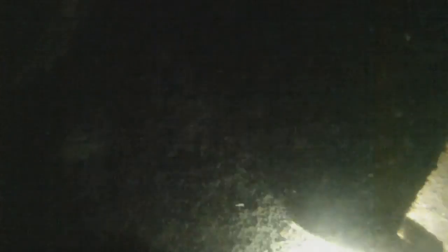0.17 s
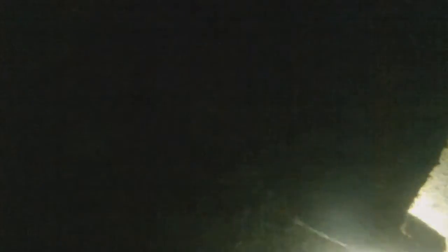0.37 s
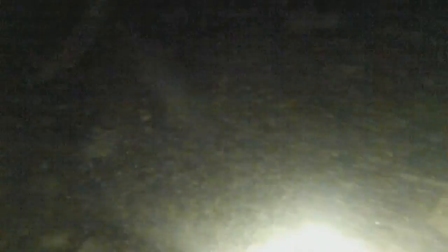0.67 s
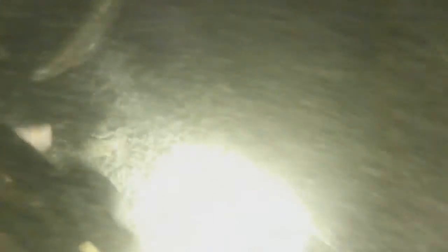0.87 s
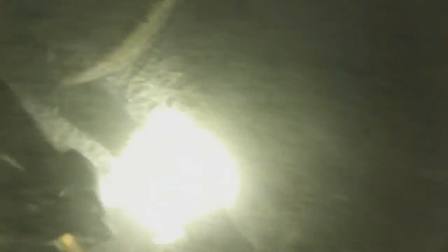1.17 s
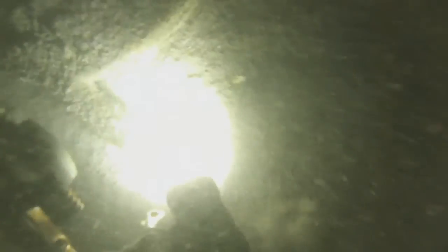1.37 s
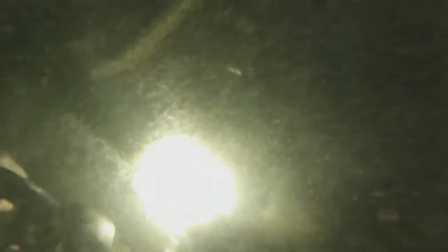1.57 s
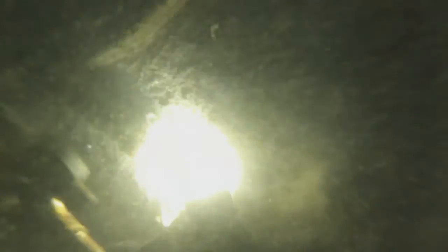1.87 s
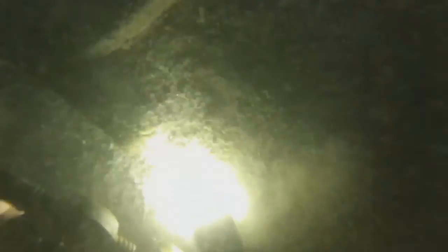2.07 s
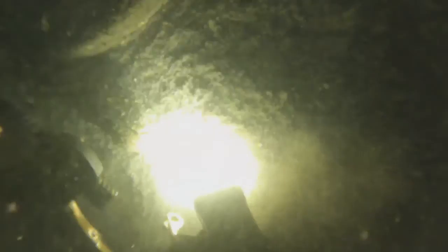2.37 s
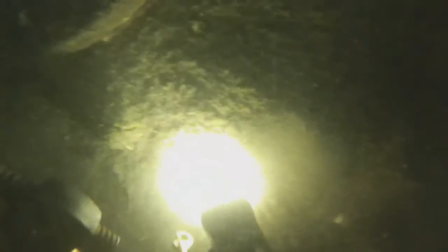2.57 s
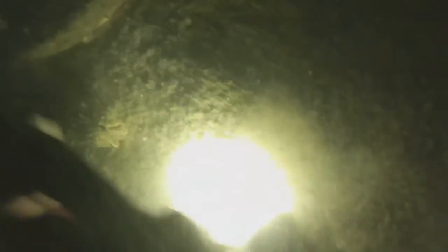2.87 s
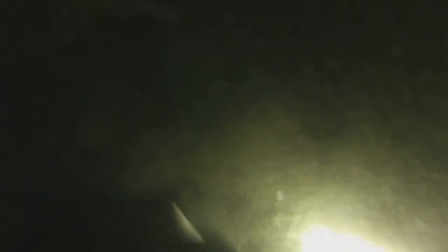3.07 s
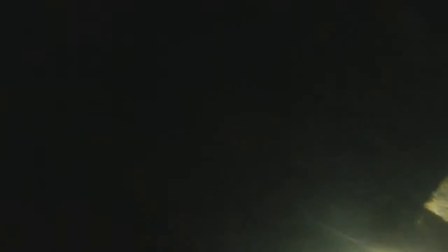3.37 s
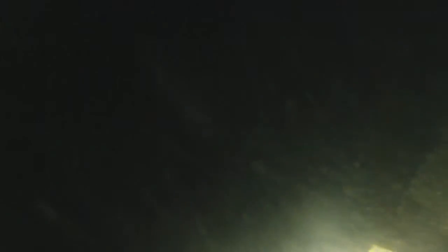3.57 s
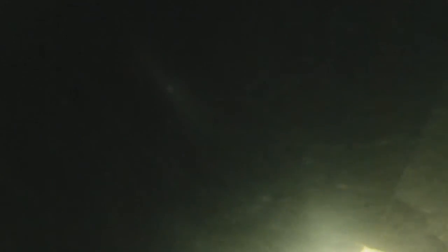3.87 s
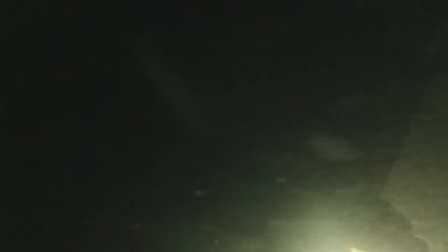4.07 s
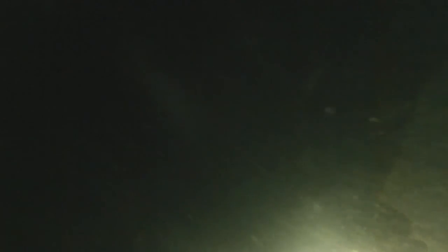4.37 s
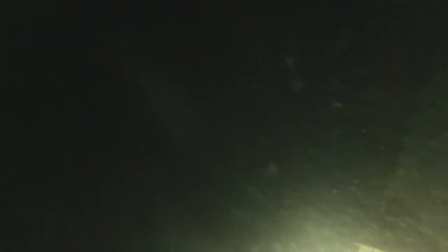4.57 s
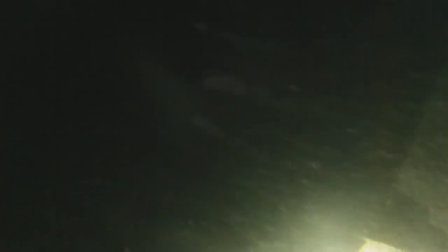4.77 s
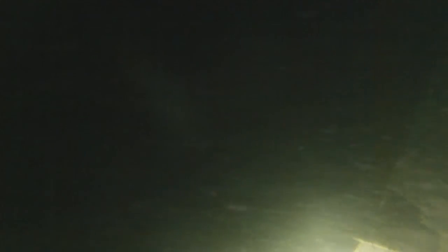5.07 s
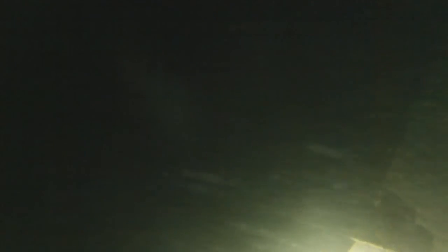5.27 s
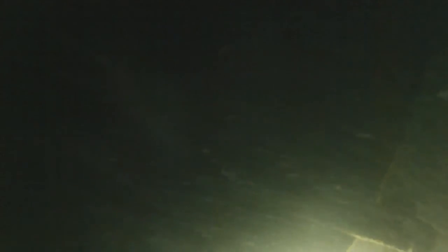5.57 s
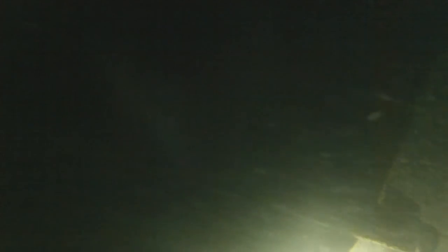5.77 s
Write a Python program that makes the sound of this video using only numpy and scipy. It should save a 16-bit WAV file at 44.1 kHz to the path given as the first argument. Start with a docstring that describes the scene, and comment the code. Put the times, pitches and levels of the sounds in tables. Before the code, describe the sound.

Sharp, close knocks and bright metal clinks come from a diver's gear hitting the camera housing underwater in a sunken ship. An early knock sets a steel part ringing briefly, and the hull booms quietly behind the blows. Low water rumble, fine crackle and a faint high whine run throughout, with small squeaks and bubbles. The second half is quieter, with soft thuds of handling, and ends on a dry snap.

```python
"""A diver moves through a flooded steel wreck, heard from inside a camera housing.
From the start, water rumbles, the camera whines, straps and silt crackle, and dragged gear squeaks.
A metal clip jingles, gear taps, then a knock sets a steel part ringing and the hull booms in answer.
Hands begin to bump the rig, a few small bubbles ring, and more knocks and booms follow.
After about three seconds the knocks stop; lighter taps and bumps go on, and one sharp snap comes last."""
import sys
import numpy as np
from scipy import signal
from scipy.fft import rfft, irfft, next_fast_len
from scipy.io import wavfile
from scipy.ndimage import uniform_filter1d

SR = 44100
rng = np.random.default_rng(int(sys.argv[2]) if len(sys.argv) > 2 else 0)


def persist_wave(psi):
    """Save psi, clipped to +-1, as 16-bit WAV."""
    counts = np.round(np.clip(psi, -1, 1) * 32767).astype(np.int16)
    wavfile.write(sys.argv[1], SR, np.atleast_2d(counts).T)


N = 260631
TIME = np.arange(N) / SR
EVENT_SIZE = 16384  # samples in one short sound
AGE = np.arange(EVENT_SIZE) / SR  # seconds since that sound began

# how hard the diver moves, given as the loudness of the rubbing: t/s, level/dB
EFFORT = [(0.0, -73), (0.42, -65), (0.56, -75.5), (0.93, -69.5), (1.24, -66), (1.35, -62), (1.71, -59.5),
          (1.86, -66.5), (2.08, -65.5), (2.24, -62.5), (2.99, -63.5), (3.02, -61), (3.41, -70), (5.8, -71)]
# tone colour of the water's rumble and hiss: f/Hz, relative level/dB
WATER_COLOUR = [(12, -32), (20, 3), (49, 0), (93, -13.5), (228, -21), (270, -24), (367, -28.5),
                (574, -28.5), (698, -29), (1660, -32), (3440, -35.5), (5080, -43), (5680, -39.5),
                (14700, -41), (16000, -46.5)]
# the camera's high tones: f/Hz, relative level/dB
WHINE_TONES = [(5039, -78), (7558, -91), (8823, -91), (11294, -91), (15122, -88)]
# narrow bands of hiss around them: f/Hz, width/Hz, relative level/dB
WHINE_HISS = [(5060, 150, -83), (15130, 150, -87)]
# notes the housing rings at: f/Hz, relative level/dB, t60/s (the time to fade by 60 dB)
HOUSING_NOTES = [(1307, -9.5, 0.018), (1380, -10, 0.013), (1591, -1.5, 0.021), (1787, -5, 0.017),
                 (2094, -12, 0.059), (2660, 6.5, 0.017), (2737, 0.5, 0.021), (3110, -21, 0.06),
                 (3240, -9.5, 0.025), (3530, -0.5, 0.017), (4210, -9, 0.048), (4750, -11.5, 0.011),
                 (5150, -1.5, 0.021), (6450, -6.5, 0.019), (7100, 1, 0.004), (8600, -5.5, 0.017),
                 (11800, -14, 0.013)]
# tone colour of a light touch: f/Hz, relative level/dB
TAP_COLOUR = [(200, -11.5), (950, -22.5), (1600, 0), (2300, 2.5), (2750, -9), (3400, -10), (4300, 4.5),
              (5300, 2), (5800, -6.5), (7200, 0.5), (9600, -14.5), (11300, -6.5), (13000, -17.5),
              (14500, -18.5)]
# gear drags over the housing: t/s, f/Hz, squeak level/dB, contact/ms, rasp level/dB
SCRAPES = [(0.028, 1530, -48, 5, -53), (0.085, 1610, -53, 5.5, -60), (1.174, 1650, -50.5, 4, -53.5),
           (1.332, 2220, -54, 2.9, -51), (1.359, 1650, -48.5, 5, -63), (2.262, 1600, -48, 17, -63),
           (3.081, 2100, -36, 3.3, -36), (3.704, 2820, -57.5, 21.4, -55.5), (3.887, 2840, -57.5, 40, -58),
           (4.115, 2750, -56, 26, -53), (4.338, 2770, -50, 27, -55), (4.662, 2740, -61.5, 10, -57),
           (5.678, 1670, -53, 19, -58.5)]
JINGLES = [(0.3216, -21, 4.4, -13, 0, 1), (0.439, -30, 1.3, -26, 2, 4), (0.4792, -39, 1.7, -4, 3, -3.5),
           (0.519, -29.5, 2.7, -19, -2, -3.5), (1.0704, -43, 2.5, -2, -13, -4),
           (1.4182, -25, 4.7, -17.5, -3.5, 1), (1.669, -37.5, 3.3, -19, -1, 5.5),
           (1.7626, -41.5, 0.99, -34, 7, -2), (1.8487, -27.5, 2.1, -5.5, 6.5, 4.5),
           (2.0294, -24, 2.2, -7, -8, 2.5), (3.1959, -34.5, 6.8, -42, -8.5, -10.5),
           (4.1726, -39, 0.8, -17, -24, 3)]
CLIP_NOTES = [(3645, -2, .048), (4334, -7, .026), (5233, -9, .026), (6610, -14, .035), (7400, -7, .042),
              (8696, -1, .046), (11060, -10, .045), (11450, -4, .036), (14050, -6, .03)]
CLIP_COLOUR = [(300, -21), (1000, -29.5), (1700, -1), (3000, -9.5), (3650, -2), (4700, -1), (5300, 1),
               (5900, -4.5), (7300, -1.5), (9700, -12.5), (11300, 1), (12700, -16), (14000, -8.5),
               (15500, -20)]
# the clearest taps of gear: t/s, level/dB, contact/ms, body/dB, treble/dB
TAPS = [(0.4049, -26, 14.6, -2, 3), (.602, -43.5, 1.15, -17, 2.5), (0.9915, -32, 2.1, -10, 5.5),
        (1.058, -37.5, 1.7, -4, -26), (1.083, -44, 2.1, -4, -20), (1.1131, -24.5, 1.7, -1.5, -11),
        (1.1214, -25, 3.1, -3.5, -10.5), (1.3915, -42, 8, -4, -28), (1.641, -32, 7.7, -14, -33),
        (1.685, -38.5, 7.4, 1, -5), (2.077, -34.5, 1.3, -5, 9), (2.1148, -26, 5.4, 1.5, -9),
        (2.2472, -33.5, 1.17, -12, -17.5), (2.4454, -45, 2.8, -23, -11), (2.697, -48, 2, -8, -28),
        (2.8804, -30.5, 2.2, -1.5, -17), (2.9217, -19.5, 2.6, -13, 0), (2.933, -36, 9.6, -1, -7),
        (2.977, -41.5, 18.4, 11, -12), (3.0151, -29.5, 0.62, 10, -12), (3.0816, -32, 1.7, -3.5, -19),
        (3.337, -41, 4.3, -3, -12), (3.357, -45.5, 3.4, -6, -14), (3.4519, -39, 2.9, -15, -16),
        (3.4667, -30.5, 2.8, -10, -7), (3.858, -50.5, 5.2, -9, -11.5), (3.937, -41.5, 3, -9.5, 6),
        (4.215, -48.5, 2.8, 7.5, -5)]
# the one blow that catches a steel part: t/s, level/dB
STEEL_BLOW = (0.4162, -34)
# notes that part rings at: f/Hz, relative level/dB, t60/s
STEEL_NOTES = [(1491, -9, .3), (1610, 0, .16), (2681, -17, .2)]
# blows on the housing: t/s, level/dB, contact/ms, tilt/(dB per octave), step per bounce/dB, weight/dB
KNOCKS = [(0.4165, -18, 2.6, -10.5, -4.5, -52.5), (0.4215, -8, 0.16, 4.5, -20, -40),
          (1.6206, -13.5, 2.23, -1, -5.5, -43), (1.6259, -11, 1.07, 17.5, -33.5, -35.5),
          (2.0872, -4, 1.92, 0.5, -7, -36.5), (2.5086, -8, 1.5, -2, -6.5, -31.5),
          (2.9114, -28, 0.97, -1.5, -7, -58), (3.061, -34, 0.51, -6, -7.5, -49.5)]
# tone colour of a hard blow: f/Hz, relative level/dB
KNOCK_COLOUR = [(100, -10), (330, -6), (650, -9.5), (950, -8.5), (1400, 4), (2700, 4.5), (3050, -7),
                (4600, -1), (5800, -9), (7200, -4.5), (9700, -25), (11300, -13), (13000, -30.5),
                (14500, -28)]
# low notes of the housing's hollow body: f/Hz, relative level/dB, t60/s
HOLLOW_NOTES = [(290.7, -2.5, .06), (329, -4.5, 0.16), (462, -6.5, 0.066)]
# blows straight on the hull: t/s, level/dB, tilt/(dB per octave)
HULL_BLOWS = [(1.686, -33.5, -0.5), (2.116, -34.5, -2)]
# tone colour of the echoes in the hull: f/Hz, relative level/dB
HULL_COLOUR = [(50, -5), (110, 2.5), (190, -3), (320, -9.5), (600, -6), (1000, -24), (2500, -35)]
# notes the hull's plates ring at: f/Hz, relative level/dB, t60/s
PLATE_NOTES = [(103, -11.5, 0.87), (202, -10.5, 0.41), (218, -9.5, 0.62), (324, -2, 0.05),
               (360, -3.5, 0.12), (395, -2, 0.083), (460, 0.5, 0.1), (605, -9, 0.14)]
# hands bump the rig: t/s, thud level/dB, sway level/dB
BUMPS = [(.706, -43.5, -54), (1.028, -41.5, -45.5), (1.562, -43.5, -39), (2.958, -36.5, -44.5),
         (3.288, -40.5, -60), (3.566, -36.5, -35), (3.914, -42, -50), (4.21, -44.5, -42),
         (4.446, -42.5, -40.5), (4.795, -45, -61), (4.849, -39, -67), (5.006, -38.5, -35),
         (5.104, -29.5, -49), (5.257, -51, -37.5), (5.461, -36, -30.5)]
# small bubbles: t/s, f/Hz, level/dB, t60/s
BUBBLES = [(1.06, 3020, -40, 0.062), (1.286, 3070, -51, 0.097), (2.937, 2800, -29.5, 0.037),
           (3.013, 2790, -30, 0.046)]
# one dry snap close by: t/s, level/dB, contact/ms
SNAP = (5.8501, -15, 1.43)
# tone colour of the snap: f/Hz, relative level/dB
SNAP_COLOUR = [(300, -41), (1100, -49), (2000, -16.5), (2700, -6), (3500, -8.5), (4800, -0.5), (5500, -20),
               (6300, 8), (7300, 5), (8500, -3), (9700, -7), (10500, -0.5), (13000, -18.5), (15000, -20)]


def gain(db):
    """Turn decibels into a number to multiply by."""
    return 10 ** (np.asarray(db) / 20)


def unit(x):
    """Scale a sound to an average strength (rms) of 1."""
    return x / np.sqrt(np.mean(x ** 2))


def fade(t60):
    """A smooth fade that loses 60 dB in t60 seconds."""
    return gain(-60 * AGE / max(t60, 1e-3))


def add(out, t, x, db):
    """Mix a sound in at t seconds so that its loudest 2 ms stand at db."""
    start = int(t * SR)
    peak = np.sqrt(uniform_filter1d(x ** 2, size=88).max())
    out[start:start + len(x)] += x[:N - start] * gain(db) / peak


def colour(x, points, tilt_db=0):
    """Shape a sound along (Hz, dB) points; a tilt above 0 dB per octave brightens it."""
    n = 2 * next_fast_len(len(x) // 2 + 1)
    hz, db = np.transpose(points)
    octave = np.log2(np.maximum(np.arange(n // 2 + 1) * SR / n, 1))
    curve_db = np.interp(octave, np.log2(hz), db + tilt_db * np.log2(hz / hz.mean()))
    cepstrum = irfft(np.log(gain(curve_db)))
    # fold the filter forward in time, so nothing sounds before the hit
    cepstrum[1:n // 2] *= 2
    cepstrum[n // 2 + 1:] = 0
    return irfft(rfft(x, n) * np.exp(rfft(cepstrum)))[:len(x)]


def band(x, hz, kind):
    """Keep only the lows, the highs or a band between."""
    return signal.sosfilt(signal.butter(4, hz, kind, fs=SR, output="sos"), x)


def resonate(x, hz, width_hz):
    """Keep the sound near one pitch; filtering twice makes the edges steep."""
    b, a = signal.iirpeak(hz, hz / width_hz, fs=SR)
    return signal.lfilter(b, a, signal.lfilter(b, a, x))


def ring(notes, spot_db=0, detune=0):
    """A struck thing rings with fading notes; each spot favours other notes and shifts them a little."""
    chance = rng.standard_normal((len(notes), 3))
    out = np.zeros(EVENT_SIZE)
    for (hz, db, t60), (favour, shift, phase) in zip(notes, chance):
        tone = np.sin(2 * np.pi * (hz * (1 + detune * shift) * AGE + phase))
        out += gain(db + spot_db * favour) * fade(t60) * tone
    return out


def contact(ms):
    """The push of one thing on another: it swells and lets go."""
    progress = AGE * 1000 / ms
    return progress * np.exp(-2 * progress)


def strike(ms, notes, tone_colour, ring_db, tail_t60, tail_db, spot_db, detune=0.013):
    """A hit cracks, builds up the ringing while it lasts and leaves a short tail of echoes."""
    force = contact(ms)
    rise = np.cumsum(force) / force.sum()
    loudness = unit(force) + gain(tail_db) * unit(rise * fade(tail_t60))
    crack = colour(loudness * rng.standard_normal(EVENT_SIZE), tone_colour)
    return unit(crack) + gain(ring_db) * unit(rise * ring(notes, spot_db, detune))


def balance(x, body_db, treble_db):
    """Where and how hard a thing is touched sets its body and treble against the middle."""
    body = unit(band(x, 3200, "low"))
    middle = unit(band(x, [3200, 8000], "band"))
    treble = unit(band(x, 8000, "high"))
    return gain(body_db) * body + middle + gain(treble_db) * treble


def water(rub_db, base_db=-53, split_hz=300):
    """Water pushes on the housing, rumbling more as the diver works harder, under an even hiss."""
    noise = unit(colour(rng.standard_normal(N), WATER_COLOUR)) * gain(base_db)
    boost_db = 6.5 + 0.56 * (rub_db - rub_db.max())
    rumble = band(noise, split_hz, "low") * gain(boost_db)
    hiss = band(noise, split_hz, "high") * gain(0.28)
    return rumble + hiss


def waver(spread_db=2, changes_per_s=9):
    """A loudness that wanders at random."""
    return gain(spread_db * np.interp(TIME * changes_per_s, np.arange(256), rng.standard_normal(256)))


def camera_whine(whistle_hz=7130, whistle_db=-68, whistle_end_s=0.6):
    """The camera's electronics whine unsteadily; a thin, hissy whistle dies away early on."""
    tones = sum(np.sqrt(2) * gain(db) * waver() * np.sin(2 * np.pi * hz * TIME)
                for hz, db in WHINE_TONES)
    hiss = sum(gain(db) * waver() * unit(resonate(rng.standard_normal(N), hz, width_hz))
               for hz, width_hz, db in WHINE_HISS)
    whistle = unit(resonate(rng.standard_normal(N), whistle_hz, width_hz=380))
    whistle_fade = np.clip((whistle_end_s - TIME) / 0.19, 0, 1)
    return gain(-2) * (tones + hiss) + whistle * gain(whistle_db) * whistle_fade


def rubbing(rub_db, spots=7, grains_per_s=75, spread_db=2.5):
    """Straps and silt crackle in tiny grains on several spots of the housing, each with its own ring."""
    out = np.zeros(N)
    for _ in range(spots):
        grains = (rng.random(N) < grains_per_s / SR) * rng.choice([-1, 1], N)
        strength = gain(spread_db * np.minimum(rng.exponential(size=N), 4))
        click = strike(3, HOUSING_NOTES, TAP_COLOUR, ring_db=-3,
                       tail_t60=0.04, tail_db=-6, spot_db=5, detune=0.02)
        out += signal.oaconvolve(grains * strength, unit(click)[:EVENT_SIZE // 8])[:N]
    return unit(out) * gain(rub_db)


def scrapes():
    """Dragged gear sticks and slips, squeaking over a gritty rasp; a longer drag gives a purer squeak."""
    out = np.zeros(N)
    for t, hz, squeak_db, ms, rasp_db in SCRAPES:
        slips = contact(ms) * rng.standard_normal(EVENT_SIZE) ** 3  # cubing makes the noise spiky
        add(out, t, resonate(slips, hz, width_hz=1000 / (1 + ms / 12)), squeak_db)
        add(out, t, colour(slips, TAP_COLOUR), rasp_db)
    return out


def clip_jingles(gap_s=0.0118, bounce_db=-18):
    """The metal clip grazes its ring twice, thinly and ever harder, then strikes and bounces once."""
    out = np.zeros(N)
    for t, db, ms, graze_db, treble_db, ring_db in JINGLES:
        for k in range(-2, 2):  # touch 0 is the main strike
            clink = strike(ms, CLIP_NOTES, CLIP_COLOUR, ring_db,
                           tail_t60=0.033, tail_db=-8.5, spot_db=4.5, detune=0.009)
            clink = balance(clink, body_db=-10, treble_db=treble_db + 3 * abs(k))
            weaker_db = abs(k) * (graze_db if k < 0 else bounce_db)
            add(out, t + k * gap_s, clink, db + weaker_db)
    return out


def tap(ms, body_db, treble_db):
    """One light touch makes the housing click and ring briefly."""
    click = strike(ms, HOUSING_NOTES, TAP_COLOUR, ring_db=-3,
                   tail_t60=0.029, tail_db=-19, spot_db=9, detune=0.015)
    return balance(click, body_db, treble_db)


def gear_taps():
    """Loose gear taps on the housing."""
    out = np.zeros(N)
    for t, db, ms, body_db, treble_db in TAPS:
        add(out, t, tap(ms, body_db, treble_db), db)
    return out


def stray_ticks(rub_db, most_per_s=22, above_rub_db=15.5, spread_db=5.5, tries=130):
    """Faint ticks fall at random on a few spots, louder and more often as the diver works harder."""
    out = np.zeros(N)
    per_s = most_per_s * gain(rub_db - rub_db.max()) ** 2.4
    spots = [tap(ms=1.3, body_db=-3, treble_db=-6) for _ in range(8)]
    for k, (when, luck, force) in enumerate(rng.random((tries, 3))):
        i = int(when * N)
        if luck < per_s[i] * N / SR / tries:
            db = rub_db[i] + above_rub_db + spread_db * (2 * force - 1)
            add(out, i / SR, spots[k % len(spots)], db)
    return out


def steel_ring():
    """One blow catches a steel part, which rings on."""
    out = np.zeros(N)
    t, db = STEEL_BLOW
    add(out, t, ring(STEEL_NOTES), db)
    return out


def knocks(bounce_s=0.0064, dulling_db=-2, hits=4):
    """Each blow chatters on the housing, weaker and duller each bounce; its weight rings the body."""
    out = np.zeros(N)
    for t, db, ms, tilt_db, bounce_db, weight_db in KNOCKS:
        for k in range(hits):
            blow = strike(ms, HOUSING_NOTES, KNOCK_COLOUR, ring_db=0,
                          tail_t60=0.05, tail_db=-14, spot_db=-1.5, detune=0.0097)
            blow = colour(blow, [(1200, 0), (12000, 0)], tilt_db + k * dulling_db)
            add(out, t + k * bounce_s, blow, db + k * bounce_db)
        hollow = ring(HOLLOW_NOTES, detune=0.019) * (1 - np.exp(-AGE / 0.0002))
        add(out, t, hollow, weight_db - 1)
    return out


def hull_booms(split_hz=260, onset_s=0.003):
    """The wreck's plates boom when struck and in answer to each knock; the low echoes last longest."""
    out = np.zeros(N)
    answers = [(t, weight_db - 1, 0.5) for t, *_, weight_db in KNOCKS]
    for t, db, tilt_db in list(HULL_BLOWS) + answers:
        echoes = colour(rng.standard_normal(EVENT_SIZE), HULL_COLOUR)
        lows = band(echoes, split_hz, "low") * fade(t60=0.33)
        highs = band(echoes, split_hz, "high") * fade(t60=0.13)
        plates = ring(PLATE_NOTES, spot_db=1.5, detune=0.012)
        boom = unit(lows + gain(6.5) * highs) + gain(1) * unit(plates)
        boom = colour(boom, [(80, 0), (900, 0)], tilt_db)
        add(out, t, boom * (1 - np.exp(-AGE / onset_s)), db)
    return out


def hand_bumps(thud_hz=118, sway_hz=43, sway_s=0.015):
    """Each bump thuds at a slightly different pitch, then the whole rig sways in the diver's grip."""
    out = np.zeros(N)
    for t, thud_db, sway_db in BUMPS:
        hz = thud_hz * (1 + 0.17 * rng.uniform(-0.78, 1))
        thud = np.sin(2 * np.pi * hz * AGE) * AGE * fade(t60=0.015)
        sway = np.sin(2 * np.pi * sway_hz * AGE) * AGE ** 2 * np.exp(-AGE / sway_s)
        add(out, t, thud, thud_db)
        add(out, t, sway, sway_db)
    return out


def bubbles(onset_s=0.00015):
    """Each bubble rings at its own pitch."""
    out = np.zeros(N)
    for t, hz, db, t60 in BUBBLES:
        add(out, t, ring([(hz, 0, t60)]) * (1 - np.exp(-AGE / onset_s)), db)
    return out


def gear_snap():
    """The gear snaps once: a single sharp pulse with a short, softer wash behind it."""
    out = np.zeros(N)
    t, db, ms = SNAP
    pulse = colour(signal.unit_impulse(EVENT_SIZE), SNAP_COLOUR)
    wash = strike(ms, HOUSING_NOTES, SNAP_COLOUR, ring_db=-20, tail_t60=0.03, tail_db=-12, spot_db=2)
    add(out, t, pulse, db)
    add(out, t, wash, db - 8)
    return out


def scene(side_db=-30):
    """Mix all the sounds; left and right are nearly alike, with a faint smeared difference."""
    rub_db = np.interp(TIME, *np.transpose(EFFORT))
    mix = knocks() + steel_ring() + clip_jingles() + gear_taps() + gear_snap()
    mix += scrapes() + bubbles() + hull_booms() + hand_bumps()
    mix += rubbing(rub_db) + water(rub_db) + camera_whine() + stray_ticks(rub_db)
    smear = rng.standard_normal(EVENT_SIZE) * AGE * fade(t60=0.008)
    side = gain(side_db) * signal.oaconvolve(mix, smear / np.linalg.norm(smear))[:N]
    return np.array([mix + side, mix - side])


def record(dry, limit=0.88, top_hz=15600):
    """Peaks above a fixed limit are flattened, and the highest treble is cut off."""
    treble_cut = signal.ellip(8, 0.2, 70, top_hz, fs=SR, output="sos")
    return signal.sosfilt(treble_cut, np.clip(dry, -limit, limit))


dry = scene()
out = record(dry)
persist_wave(out)
```